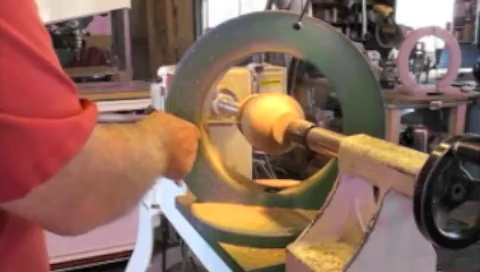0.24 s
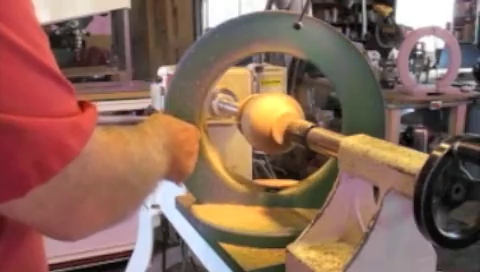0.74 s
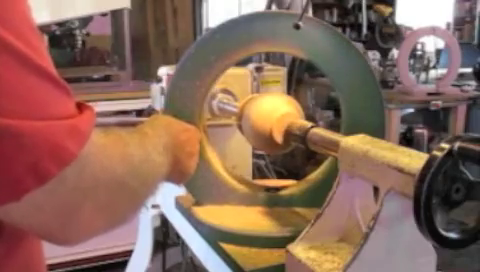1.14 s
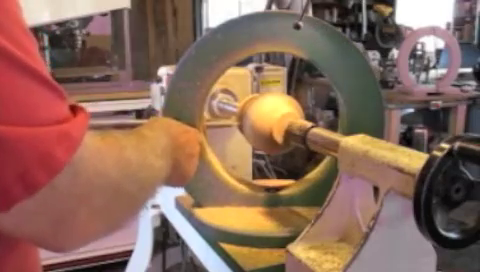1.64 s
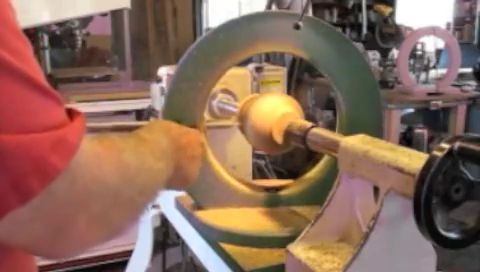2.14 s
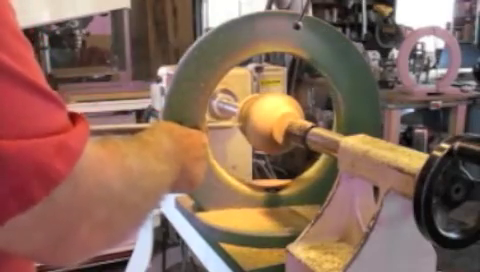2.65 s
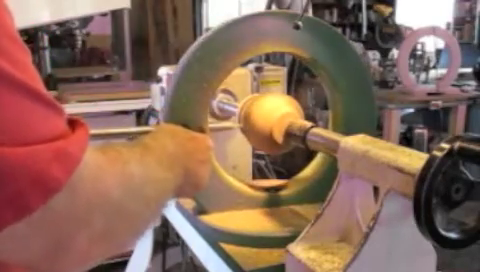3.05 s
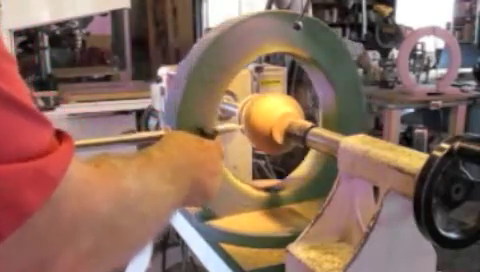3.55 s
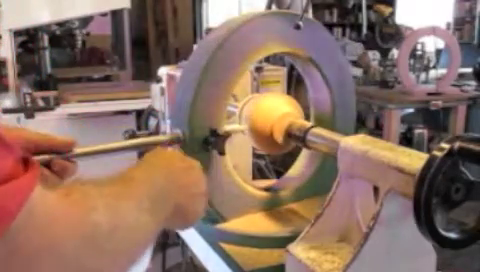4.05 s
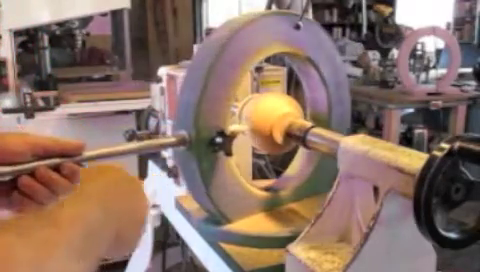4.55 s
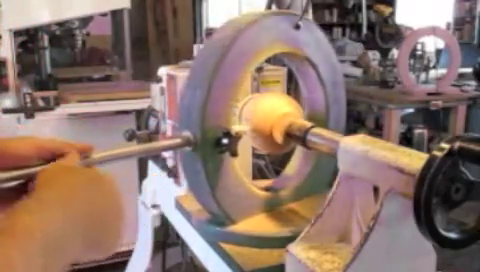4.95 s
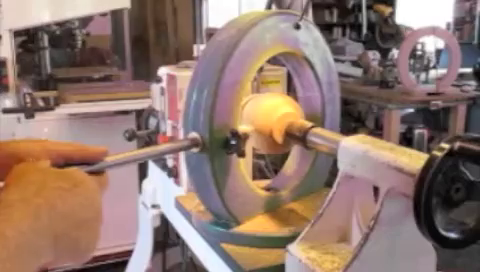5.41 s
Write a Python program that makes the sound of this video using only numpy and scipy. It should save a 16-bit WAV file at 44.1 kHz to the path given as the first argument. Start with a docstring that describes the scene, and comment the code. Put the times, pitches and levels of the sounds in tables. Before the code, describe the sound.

Close-miked woodturning: a steady, loud scrape of tearing fibres, coarse in the mids and sizzling on top, pulses about fifteen times a second. It stops abruptly around three seconds, with a tiny last touch; the running lathe's hum, wheel rumble and high electric whine swell up. Near four seconds the edge bites again, hissier, uneven and crackly. Short workshop reverberation; levels are evened out by automatic gain.

```python
"""Turning a wooden blank on a lathe

In a workshop, close over the running lathe, a long steel tool cuts a wooden blank spinning in a steady rest.
Tearing fibres, made as random grains, hiss and set wood and steel ringing, throbbing with every turn.
The tool lifts off for most of a second; the recorder's gain control then brings up the motor hum,
the rolling wheels and the whine of the drive. A small microphone dulls the top."""
import sys
import numpy as np
from scipy import signal
from scipy.fft import rfft, irfft
from scipy.io import wavfile
from scipy.ndimage import uniform_filter1d

SR = 44100
rng = np.random.default_rng(int(sys.argv[2]) if len(sys.argv) > 2 else 0)


def int16_out(signal):
    """Quantize to a 16-bit WAV file."""
    q = np.round(np.clip(np.atleast_2d(signal).T, -1, 1) * 32767)
    wavfile.write(sys.argv[1], SR, q.astype(np.int16))


N = 250488
TIME = np.arange(N) / SR   # seconds
TURNS_PER_S = 14.8


def scene():
    """The cut with its tail in the workshop, over the running lathe."""
    tool = cut()
    tail = from_db(SHOP_DB) * workshop(tool)
    return (tool + tail + lathe())[None]


# Resonances of the wood. Each row: frequency in Hz, width in Hz, relative level in dB.
WOOD_MODES = [(522.5, 9.8, -3), (684, 41, -7.5), (1184, 48, -3), (1217, 23, 5.5), (1440, 98, -22),
              (1556, 115, -3), (1814, 160, -0.5), (1965, 30, 7), (2283, 22, 8.5), (2420, 61, -2),
              (2610, 78, 3)]
# Low resonances of the whole blank. Each row: frequency in Hz, width in Hz, relative level in dB.
BLANK_MODES = [(181, 11, -10), (297, 190, -11.5), (522.6, 23.5, 1.5), (587, 29, -2), (844, 47, 3),
               (980, 53, -0.5), (1264, 160, -5.5)]
# Resonances of the tool rest, which rattles more on rough wood. Each row: frequency in Hz, width in Hz,
# relative level in dB.
REST_MODES = [(2043, 110, -3), (2620, 210, -8), (3030, 280, -7), (3590, 166, -1), (3874, 42, 7.5),
              (4440, 260, -8.5), (5384, 204, 1.5), (5587, 145, 2.5)]
# Resonances of the tool's steel bar. Each row: frequency in Hz, width in Hz, relative level in dB.
BAR_MODES = [(1332, 60, -2), (2361, 67, 3), (3076, 87, -11), (3780, 72, -2.5), (4480, 51, -13.5),
             (5446, 41, 3.5), (6703, 81, 4.5), (7080, 62, -4), (8080, 340, 6)]
# Resonances of the cutting edge. Each row: frequency in Hz, width in Hz, relative level in dB.
EDGE_MODES = [(6885, 150, -6), (7193, 310, -1)]
# Broad spectrum of tearing wood. Each row: frequency in Hz, relative density in dB per Hz.
TEARING_SPECTRUM = [(60, -41), (200, -12.5), (450, -16.5), (800, -14), (1150, 4), (1550, -5.5), (2400, 1.5),
                    (2900, -9), (4500, -9.5), (7000, -12), (12000, -40)]
# Broad spectrum of the fibres' hiss. Each row: frequency in Hz, relative density in dB per Hz.
HISS_SPECTRUM = [(4700, -16.5), (5400, 1), (6200, -8), (6800, -10), (7650, -13), (8250, 5.5), (9050, 0),
                 (9600, 0.5), (10300, 11), (10900, -3), (11700, -33), (12450, 0), (13700, -23.5),
                 (15100, -17)]
# Thickness of the shaving; a thick one tears louder and hisses more. Each row: time in seconds, level in dB.
SHAVING = [(0, 1.5), (.9, 2), (1.35, 6.5), (2.45, 1.5), (2.9, -7), (4.0, -14.5), (4.35, -8), (5.05, -5.5),
           (5.45, 1), (5.68, -2.5)]
# Roughness under the edge; rough wood shakes rest and blank more and deepens the hiss's throb. Each row: time
# in seconds, level in dB.
ROUGHNESS = [(0, 3.5), (.5, 4.5), (1.4, 2), (2.9, -3.5), (4.2, -9), (4.7, -0.5), (5.4, 5), (5.68, 3.5)]
# Ring of the cutting edge. Each row: time in seconds, level in dB.
EDGE_RING = [(0, -33), (.5, -31.5), (1.2, -25.5), (1.6, -31.5), (2.6, -32.5), (3.9, -31), (4.2, -40.5),
             (4.7, -30.5), (5.68, -30.5)]
# The tip's squeal as the tool is swung. Each row: time in seconds, frequency in Hz, level in dB.
SQUEAL_GLIDE = [(0, 8280, -39), (.55, 8520, -26.5), (1.0, 8560, -29), (1.78, 8650, -25), (2.05, 8590, -45),
                (2.9, 8660, -27.5), (3.92, 8810, -29.5), (4.1, 8680, -25), (4.5, 8580, -24.5),
                (4.75, 8600, -29), (5.35, 8740, -24), (5.68, 8560, -30.5)]

WOOD_DB, REST_DB, BAR_DB = -38, -38.5, -33.5   # before pressure; shaving and roughness add to the first two
HISS_PER_SHAVING = 0.27      # dB of hiss for each dB of shaving
BLANK_PER_ROUGHNESS = 0.71   # dB of the blank's ring for each dB of roughness
THROB_PER_ROUGHNESS = 1.9    # dB of the hiss's throb depth for each dB of roughness
OVAL_PER_SHAVING = -0.68     # dB of the second swell's depth for each dB of shaving: thin ones feel the oval more
# the out-of-round blank's swells, once, twice, three times a turn: depth in dB at 0 dB shaving or roughness,
# and where each peaks as a share of its own cycle
WOOD_SWINGS, WOOD_CRESTS = (1.75, 1.14), (.08, .28)
HISS_SWINGS, HISS_CRESTS = (0.5, 0.6, 0.67), (.67, .66, .29)


def cut():
    """Fibres snap in a dense, uneven stream and drive the wood, the tool rest, the tool's steel bar and its
    edge."""
    *_, hiss_db, blank_db, uneven_db = of_each_cut()
    shaving_db, = in_time(SHAVING)
    rough_db, = in_time(ROUGHNESS)
    edge_db, = in_time(EDGE_RING)
    squeal_hz, squeal_db = in_time(SQUEAL_GLIDE)

    catching_db = uneven_db * drift(145)   # shavings catch and let go
    once_db = WOOD_SWINGS[0]
    twice_db = WOOD_SWINGS[1] * from_db(OVAL_PER_SHAVING * shaving_db)
    wood_throb_db = throb((once_db, twice_db), WOOD_CRESTS)
    tearing = from_db(wood_throb_db + digs() + 0.71 * catching_db + 1.3 * drift(27))
    hiss_throb_db = from_db(THROB_PER_ROUGHNESS * rough_db) * throb(HISS_SWINGS, HISS_CRESTS)
    scraping = from_db(hiss_throb_db + catching_db + 0.67 * drift(47))

    # coarse splinters shake the wood, the blank and rest together, and the bar
    splinters = [tearing * grains(per_s=7000, spread_db=2.0) for _ in range(4)]
    ringing_wood = from_db(-3.5) * resonate(splinters[0], WOOD_MODES)
    torn_wood = from_db(-2.0) * coloured(splinters[1], TEARING_SPECTRUM)
    wood = from_db(WOOD_DB + shaving_db) * (ringing_wood + torn_wood)
    blank = from_db(blank_db + BLANK_PER_ROUGHNESS * rough_db) * resonate(splinters[2], BLANK_MODES)
    rest = from_db(REST_DB + rough_db) * resonate(splinters[2], REST_MODES)
    bar = from_db(BAR_DB) * resonate(splinters[3], BAR_MODES)

    # fine fibres hiss over the edge and keep it singing
    fibres = [scraping * grains(per_s=22000, spread_db=2.5) for _ in range(3)]
    edge = from_db(edge_db) * resonate(fibres[0], EDGE_MODES)
    tip = from_db(squeal_db) * squeal(fibres[1], squeal_hz)
    hiss = from_db(hiss_db + HISS_PER_SHAVING * shaving_db) * coloured(fibres[2], HISS_SPECTRUM)
    return contact() * (wood + blank + rest + bar + edge + tip + hiss)


# The edge meets the wood. Each row: start in seconds, end in seconds, bite in dB, hiss in dB,
# low ring of the blank in dB, unevenness of the shaving in dB.
CUTS = [(-.05, 2.938, 2.5, -26, -53.5, 0.94), (2.965, 3.003, -4.5, -30, -63, 0.5),
        (3.876, 5.75, -2.5, -28, -46.5, 2.0)]
# How hard the tool is pressed on. Each row: time in seconds, level in dB.
PRESSURE = [(0, 8.5), (.5, 17.5), (2.1, 14), (2.75, 11.5), (3.9, 12.5), (4.1, 18.5), (5.0, 24), (5.4, 11),
            (5.68, 13.5)]
ATTACK_S, RELEASE_S = .01, 0.0058   # the edge sinks in; its force dies away as it lifts


def contact():
    """Force of the edge: each cut sinks in, holds and dies away, under the hand's pressure."""
    force = np.zeros(N)
    for start, end, bite_db, *_ in CUTS:
        attack = np.clip((TIME - start) / ATTACK_S, 0, 1)
        release = np.exp(-np.maximum(TIME - end, 0) / RELEASE_S)
        force += from_db(bite_db) * attack * release
    pressure_db, = in_time(PRESSURE)
    return force * from_db(pressure_db)


def of_each_cut():
    """The columns of the latest cut's row at every sample."""
    rows = np.array(CUTS)
    latest = np.searchsorted(rows[:, 0], TIME) - 1
    return rows[np.maximum(latest, 0)].T


# The edge digs in for an instant. Each row: time in seconds, extra level in dB.
DIGS = [(.302, 5.5), (1.975, 3), (2.04, 3.5), (3.961, 5.5), (4.163, 7), (4.335, 3), (4.405, 0.5),
        (4.475, 0), (5.345, 4), (5.48, 4), (5.62, 3.5)]
DIG_S = 0.01   # half-length of a dig


def digs():
    """Swell in dB where a thicker splinter tears out."""
    return sum(db * np.exp(-((TIME - s) / DIG_S) ** 2) for s, db in DIGS)


def throb(swings_db, crests):
    """Swell in dB as the high sides of the blank pass the edge."""
    turns = TURNS_PER_S * TIME
    swell_db = np.zeros(N)
    for per_turn, (db, crest) in enumerate(zip(swings_db, crests), start=1):
        swell_db += db * np.cos(2 * np.pi * (per_turn * turns - crest))
    return swell_db


SQUEAL_WIDTH_HZ = 85


def squeal(fibres, hz):
    """The tip's sharpest resonance, gliding as the tool is swung; rms 1."""
    carrier = np.exp(2j * np.pi * np.cumsum(hz) / SR)
    r = np.exp(-np.pi * SQUEAL_WIDTH_HZ / SR)
    # shift the resonance to 0 Hz, filter, shift back
    envelope = signal.lfilter([1 - r], [1, -r], fibres / carrier)
    return rms_one((carrier * envelope).real)


# Rumble of the lathe running free. Each row: frequency in Hz, relative density in dB per Hz.
RUMBLE_SPECTRUM = [(30, -13), (65, -17), (120, -12), (175, -12), (300, -7.5), (450, -5), (800, -2.5),
                   (1400, -2), (2270, -9), (4000, -23), (7000, -29), (16000, -70)]
# Air round the spindle. Each row: frequency in Hz, relative density in dB per Hz.
AIR_SPECTRUM = [(1000, 1), (2500, 7.5), (4500, 2.5), (6500, -3.5), (8500, -0.5), (10200, 5), (11000, -2),
                (12000, -29), (16000, -32)]
# Tones of the motor's hum. Each row: frequency in Hz, relative level in dB.
HUM_TONES = [(59.2, -69), (75.4, -66), (96.9, -61), (118.4, -61), (140.0, -59), (231.5, -57), (285.3, -60),
             (344.5, -59), (419.9, -50), (463.0, -63), (522.2, -60), (576.0, -57), (748.3, -53),
             (920.5, -55), (1039, -54), (1206, -58)]
# Switching tones of the drive and their sidebands. Each row: frequency in Hz, relative level in dB.
WHINE_TONES = [(5879, -66), (9173, -67), (9243, -62), (9388, -56), (9458, -63), (9749, -55), (9819, -49.5),
               (9895, -50.5), (9964, -54), (10034, -50), (10110, -58), (10180, -52), (10271, -59),
               (10610, -63), (10686, -73), (10756, -71), (10826, -58)]


def lathe():
    """Wheels rumble and tick on the wood, air hisses round the spindle, the motor hums, its drive whines."""
    # the rolling swells four times a turn
    rolling_db = 0.47 * np.cos(2 * np.pi * 4 * TURNS_PER_S * TIME)
    rolling = grains(per_s=2500, spread_db=0.0) * from_db(rolling_db)
    rumble = from_db(-39.5) * coloured(rolling, RUMBLE_SPECTRUM)
    air = from_db(-47.0) * coloured(rng.standard_normal(N), AIR_SPECTRUM)
    hum = from_db(-0.1) * tones(HUM_TONES, wander_hz=0.55, flutter_db=0.0)
    whine = from_db(3.5) * tones(WHINE_TONES, wander_hz=0.86, flutter_db=0.3)
    return rumble + air + hum + whine


SHOP_T60_S, SHOP_DB = 0.3, -8   # time for the tail to fall 60 dB; its level against the direct sound


def workshop(x):
    """The room as a diffuse, decaying noise tail that starts after the first reflection."""
    t = np.arange(SR // 2) / SR
    decay = from_db(-60 * t / SHOP_T60_S)
    tail = rng.standard_normal(len(t)) * decay * (t > .005)
    return signal.fftconvolve(x, tail / np.sqrt(np.sum(tail ** 2)))[:N]


DIP_HZ, DIP_WIDTH_HZ, TOP_HZ = 11800, 2500, 12150   # treble dip's centre and width, start of the roll-off


def microphone(x):
    """A small microphone with a deep dip in the high treble and a dull top."""
    dip = signal.iirnotch(DIP_HZ, DIP_HZ / DIP_WIDTH_HZ, fs=SR)
    roll_off = signal.butter(2, TOP_HZ, fs=SR, output="sos")
    return signal.sosfilt(roll_off, signal.lfilter(*dip, x))


def gain_control(x, threshold_db, slope, window_s):
    """Turns the gain down by most of what the local average level exceeds the threshold."""
    # the averaging window is centred on each sample
    power = uniform_filter1d(np.mean(x ** 2, axis=0), int(window_s * SR))
    over_db = np.maximum(10 * np.log10(power + 1e-12) - threshold_db, 0)
    return x * from_db(-slope * over_db)


CUTOFF_HZ = 15600


def record(dry):
    """Microphone, gain control, then a steep filter cuts the top."""
    held = gain_control(microphone(dry), threshold_db=-22.5, slope=0.99, window_s=0.11)
    top_cut = signal.ellip(10, .1, 90, CUTOFF_HZ, fs=SR, output="sos")
    return signal.sosfilt(top_cut, held)


def grains(per_s, spread_db):
    """Random clicks of uneven size and either sign; rms 1."""
    sizes = from_db(spread_db * np.minimum(rng.exponential(1, N), 5))
    clicks = rng.random(N) < per_s / SR
    return rms_one(clicks * sizes * rng.choice([-1, 1], N))


def resonate(x, modes):
    """Parallel two-pole resonances of alternating sign; rms 1."""
    out = np.zeros(N)
    for k, (hz, width_hz, db) in enumerate(modes):
        r = np.exp(-np.pi * width_hz / SR)
        poles = [1, -2 * r * np.cos(2 * np.pi * hz / SR), r * r]
        ring = signal.lfilter([1 - r * r, 0, r * r - 1], poles, x)
        out += (-1) ** k * from_db(db) * ring
    return rms_one(out)


def coloured(x, spectrum):
    """Shape a signal by a broad spectrum, fading out below its first row; rms 1."""
    hz, db = np.transpose(spectrum)
    bins = np.maximum(np.fft.rfftfreq(N, 1 / SR), 1)
    fade = np.minimum(bins / hz[0], 1) ** 2
    shape = from_db(np.interp(np.log(bins), np.log(hz), db))
    return rms_one(irfft(rfft(x) * fade * shape, N))


def tones(lines, wander_hz, flutter_db):
    """Sine tones that waver a little in pitch and, given a flutter, in level."""
    out = np.zeros(N)
    for hz, db in lines:
        cycles = np.cumsum(hz + wander_hz * drift(5.7)) / SR + rng.random()
        level = np.sqrt(2) * from_db(db + flutter_db * drift(2.1))   # dB are rms
        out += level * np.sin(2 * np.pi * cycles)
    return out


def drift(rate_hz):
    """Smooth chance with spread 1: low-passed noise, made at a twentieth of the sample rate."""
    r = np.exp(-2 * np.pi * rate_hz * 20 / SR)
    noise = rng.standard_normal(N // 20 + 4002)
    slow = signal.lfilter([1], [1, -2 * r, r * r], noise)[4000:]   # drop the filter's start
    return np.interp(np.arange(N) / 20, np.arange(len(slow)), rms_one(slow))


def in_time(rows):
    """Each column of a curve table, after its times, at every sample."""
    s, *columns = np.transpose(rows)
    return [np.interp(TIME, s, c) for c in columns]


def from_db(db):
    """Decibels to gain."""
    return 10 ** (np.asarray(db) / 20)


def rms_one(x):
    """Scale to unit rms."""
    return x / np.sqrt(np.mean(x ** 2) + 1e-20)


dry = scene()
out = record(dry)
int16_out(out)
```